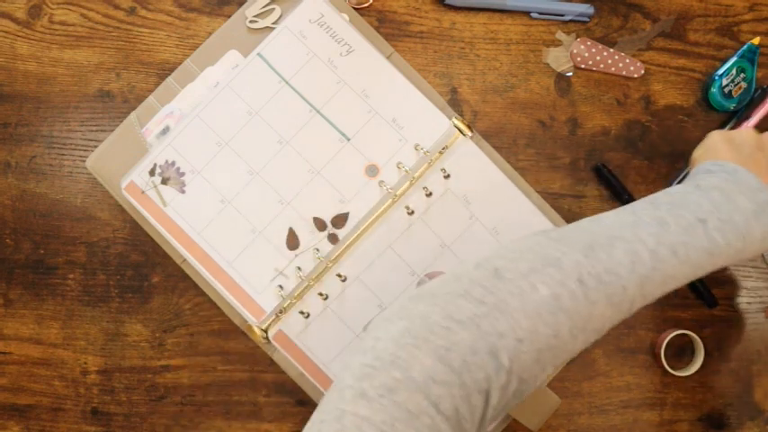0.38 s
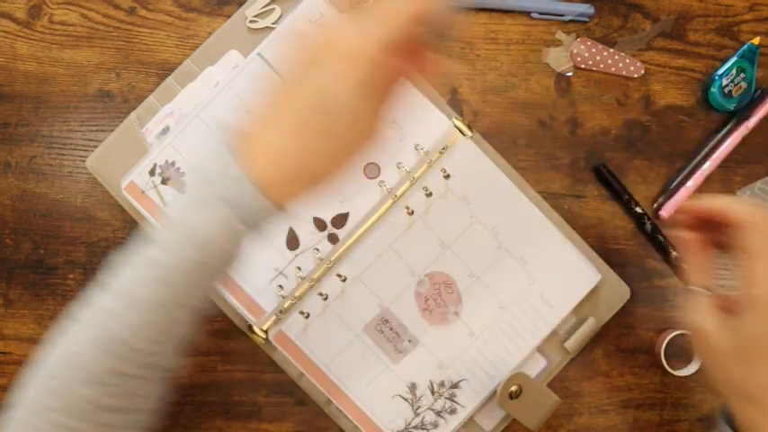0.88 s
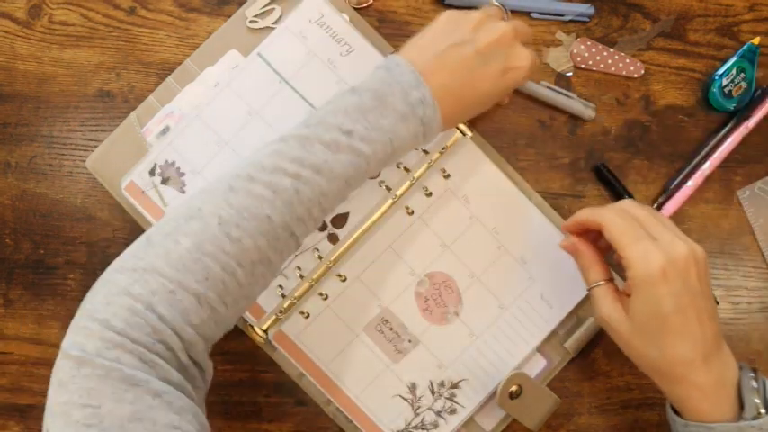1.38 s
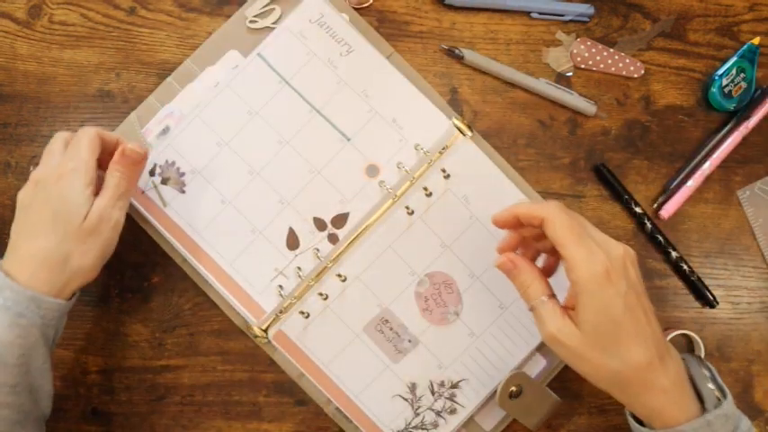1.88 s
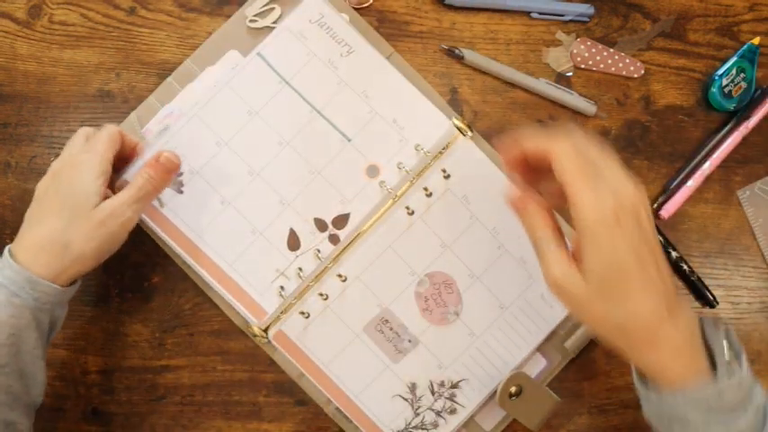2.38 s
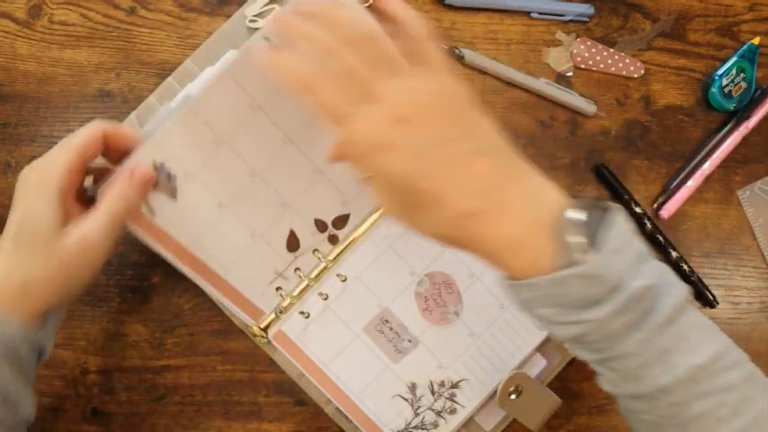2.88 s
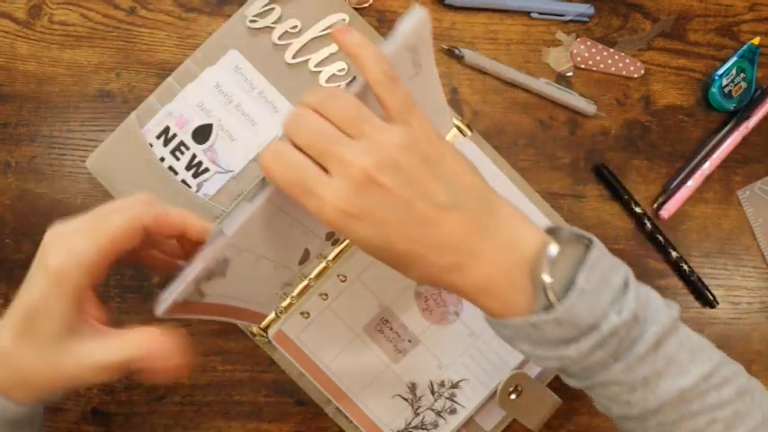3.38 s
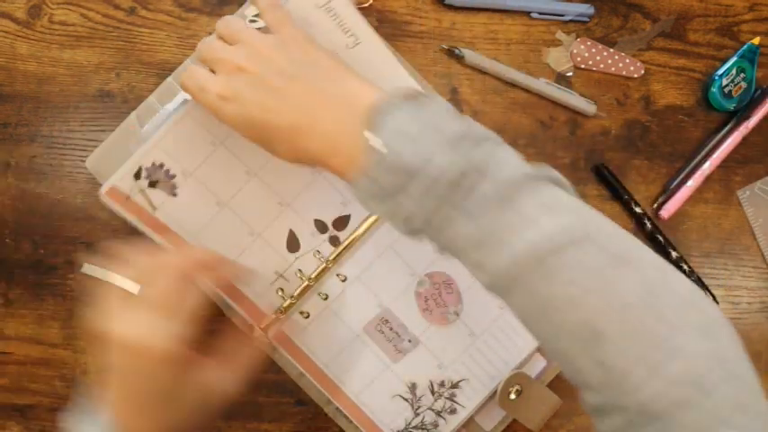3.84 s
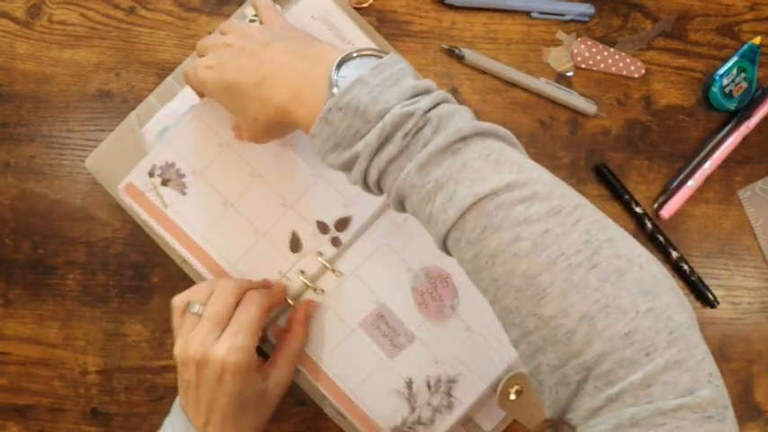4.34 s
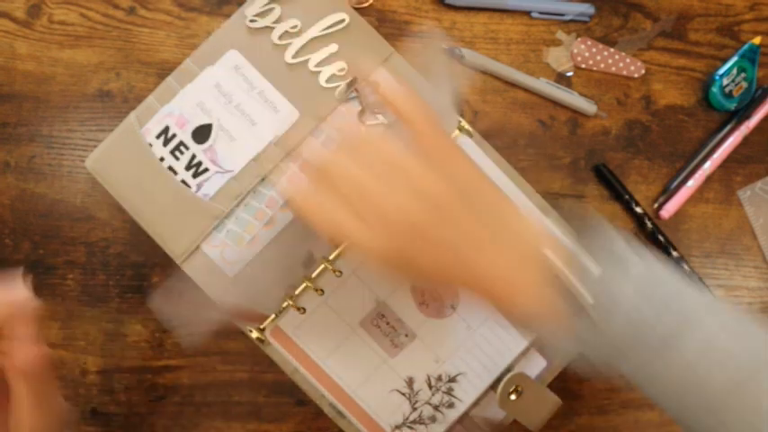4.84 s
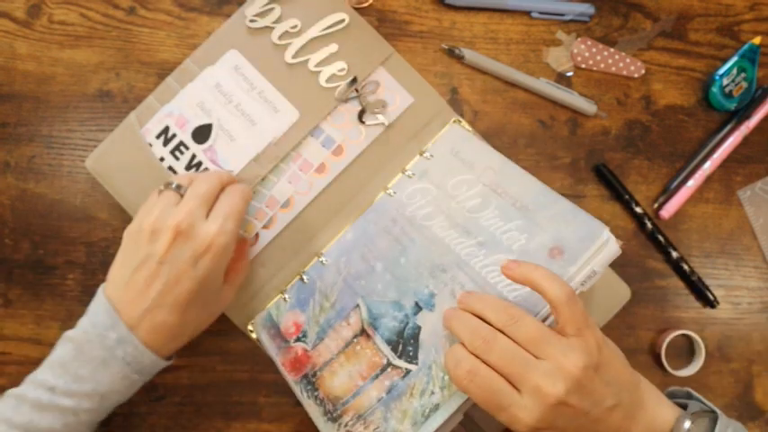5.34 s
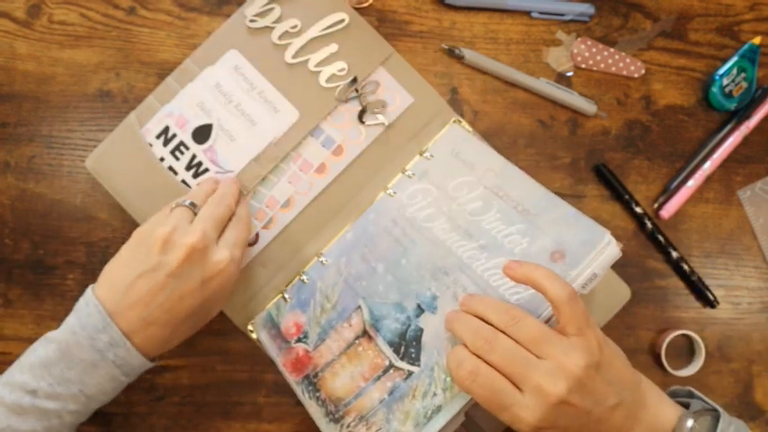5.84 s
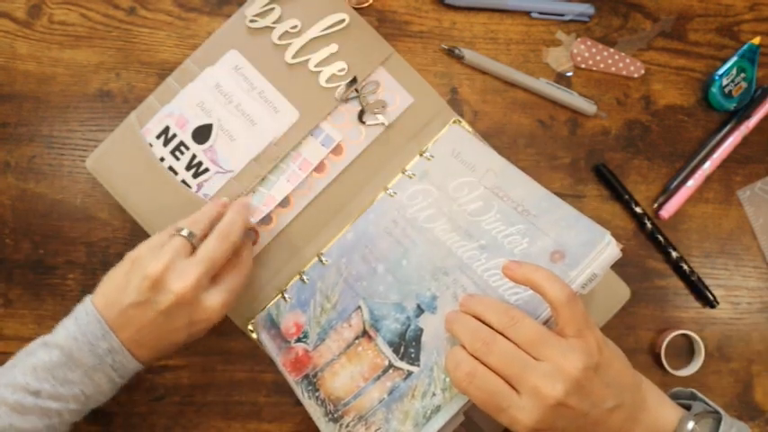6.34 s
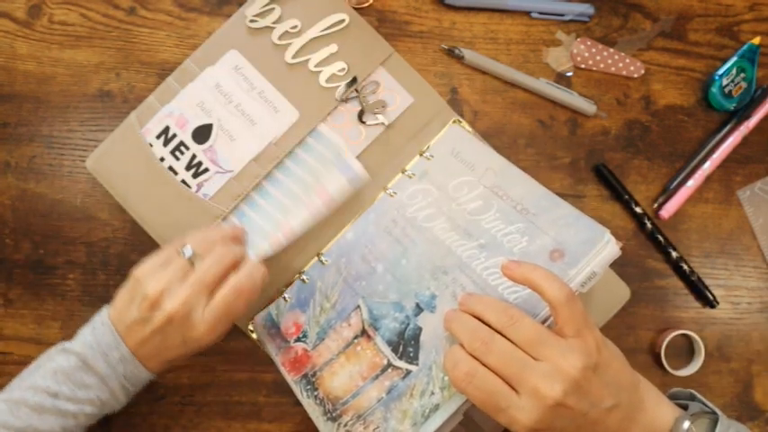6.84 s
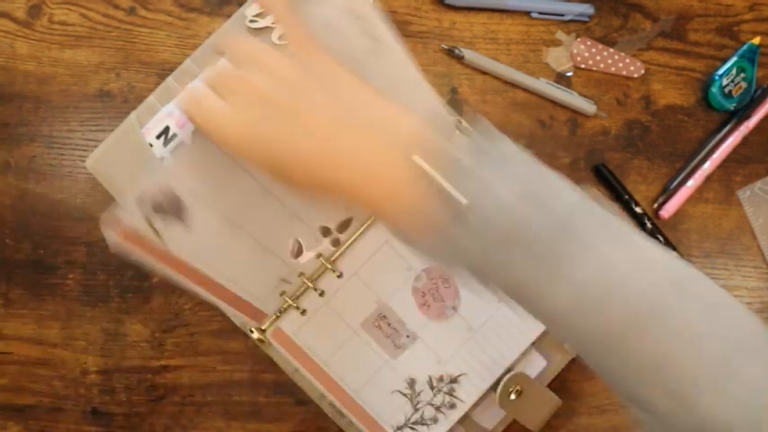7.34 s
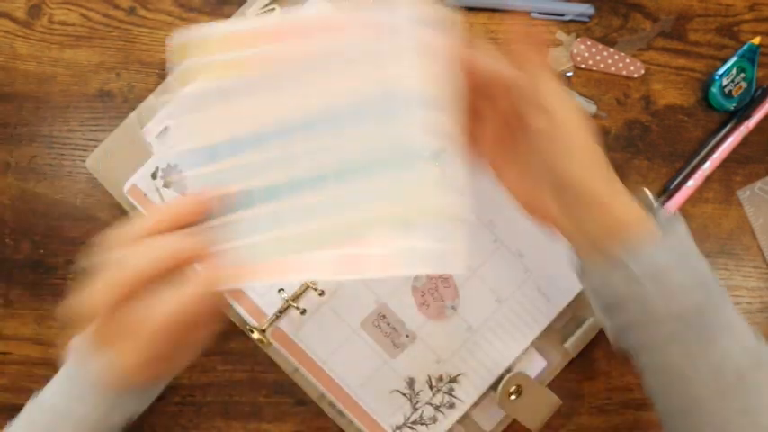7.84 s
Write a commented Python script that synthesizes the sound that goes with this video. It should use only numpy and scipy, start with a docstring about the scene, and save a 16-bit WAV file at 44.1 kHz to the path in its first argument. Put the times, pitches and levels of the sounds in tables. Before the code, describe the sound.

Pens clatter onto a wooden desk, paper rustles softly, binder rings snap loudly, then a sheet slides from a pocket and pages slap shut.

```python
"""Paper, pens and a binder are handled at a wooden desk in a quiet room.
Pages are thumbed, turned, slid from a pocket and slapped shut: fluttering fibre noise, dense sheet modes, puffs of air.
Plastic pens clatter and binder rings snap as short chatters that ring modes; blows and rolling drive the desk top.
Noise fills the room, which reflects hits and rubbing. Two close ports pick it all up, hits widened, and a
limiter follows."""
import sys
import numpy as np
from scipy import signal
from scipy.fft import rfft, irfft
from scipy.io import wavfile

SR = 44100
rng = np.random.default_rng(int(sys.argv[2]) if len(sys.argv) > 2 else 0)


def inscribe(sig):
    """Save sig as 16-bit PCM at rate SR to the path in sys.argv[1].

    A 1-D sig is mono; a 2-D sig holds one channel per row.
    Samples are clipped to [-1, 1] before scaling.
    """
    pcm = np.round(np.clip(np.atleast_2d(sig).T, -1, 1) * 32767)
    wavfile.write(sys.argv[1], SR, pcm.astype(np.int16))


def linear_from_db(decibels):
    """Turn decibels (scalar or array-like) into linear amplitude factors; 0 gives 1."""
    return 10 ** (np.asarray(decibels, float) / 20)


N = 351474

WIDEN_DB = 5.0   # gain of the difference between the ports


def rms_one(x):
    """Scale to unit rms."""
    return x / np.sqrt(np.mean(x ** 2) + 1e-20)


def at_hz(points, hz):
    """Read a table along log frequency."""
    table_hz, values = np.array(points).T[:2]
    return np.interp(np.log(hz + 1), np.log(table_hz), values)


def coloured(x, spectrum):
    """Weight a signal by a spectrum in dB, nothing outside its ends."""
    size = x.shape[-1]
    hz = np.arange(size // 2 + 1) * SR / size
    inside = (hz >= spectrum[0][0]) & (hz <= spectrum[-1][0])
    return irfft(rfft(x) * linear_from_db(at_hz(spectrum, hz)) * inside, size)


def band_limited(x, edges_hz, kind="low"):
    """Second-order Butterworth filter."""
    return signal.sosfilt(signal.butter(2, edges_hz, kind, fs=SR, output="sos"), x)


def swells(at, rise, fall, db):
    """Each movement gains 20 dB in its rise time and loses 20 dB in its fall time; movements add."""
    t, out = np.arange(N) / SR, np.zeros(N)
    for s, up, down, top_db in zip(at, rise, fall, db):
        near = slice(max(round((s - 3 * up) * SR), 0), round((s + 3 * down) * SR))
        out[near] += linear_from_db(top_db - 20 * np.maximum((s - t[near]) / up, (t[near] - s) / down))
    return out


def stereo(mid, side):
    """Left and right from mid and side."""
    return np.array([mid + side, mid - side])


def widened(pair):
    """Raise the difference between the two ports."""
    return stereo((pair[0] + pair[1]) / 2, linear_from_db(WIDEN_DB) * (pair[0] - pair[1]) / 2)


def all_around(mid, side, width):
    """Sound from every direction: the side is weighted by a width table, held level beyond its ends."""
    return stereo(mid, coloured(side, [(10, width[0][1])] + list(width) + [(20000, width[-1][1])]))


def air():
    """The steady noise of the room, alike at both ports in the bass and wide in the treble."""
    # Each row: frequency in Hz, relative density in dB per Hz.
    spectrum = [(13, -22.5), (22, -5), (82, -0.5), (299, -9.5), (344, -10), (394, -9), (440, -11),
                (664, -8.5), (722, -13), (1000, -14), (1250, -18), (1840, -17), (4550, -33), (7880, -38.5),
                (15700, -48.5)]
    # Each row: frequency in Hz, side in dB re mid.
    width = [(60, -23.5), (130, -4.5), (290, 3.5), (640, 2), (1410, 5), (3100, 9), (6820, 7.5),
             (15000, 7.5)]
    level_db = -52   # mid rms
    mid, side = coloured(rng.standard_normal((2, N)), spectrum)
    return linear_from_db(level_db) / mid.std() * all_around(mid, side, width)


def slides():
    """Skin and paper brush on paper: fibres catch thousands of times a second; the pressure flutters."""
    # Strokes. Each row: firmest at in seconds, rise in seconds, fall in seconds, hiss in dB, body in dB re hiss.
    strokes = [(0.6, .15, 0.46, -75, -0.5), (2.08, 0.48, 0.8, -74, 4.5), (2.226, .02, 0.023, -58.5, -12),
               (2.28, 0.024, 0.032, -63.5, 2), (2.36, 0.01, 0.12, -65, 4), (2.547, 0.016, 0.047, -49, -8),
               (2.585, 0.082, 0.062, -67, 14), (2.755, 0.023, 0.061, -70, 2),
               (2.848, 0.053, 0.079, -63, -1), (3.16, 0.018, .08, -56.5, -8),
               (3.656, 0.13, 0.074, -68, 5.5), (3.802, 0.089, 0.13, -59.5, -1),
               (4.02, 0.04, 0.24, -66, -11), (4.11, .2, 0.021, -64.5, -1), (4.2, 0.027, 0.05, -75, -2),
               (4.85, 0.02, .3, -67.5, 0), (5.257, 0.013, 0.019, -64, 1), (5.36, 0.06, 0.028, -67, -8),
               (5.43, 0.024, 0.1, -74, 3.5), (5.678, 0.032, 0.11, -66.5, -9), (6.0, 0.048, 0.29, -74, 3),
               (6.17, 0.16, .08, -68, -8), (6.24, 0.044, 0.037, -70, 8), (6.37, 0.055, 0.089, -59, 5),
               (6.534, 0.062, .15, -55.5, -7), (6.59, .1, 0.1, -61, 11), (7.14, .04, 0.055, -62, 5),
               (7.21, 0.037, 0.014, -56, 2), (7.296, 0.039, 0.033, -61, 3),
               (7.404, 0.034, 0.034, -57.5, 10), (7.526, 0.043, .02, -43.5, -7),
               (7.728, .02, 0.02, -61, -9), (7.965, 0.015, 0.027, -60.5, 10.5)]
    # A sheet drawn from its pocket, faster until it slips free. Each row: time in seconds, hiss in dB.
    pull_track = [(6.69, -76), (6.719, -51.5), (6.917, -49.5), (6.975, -41.5), (7.017, -35), (7.044, -36),
                  (7.065, -63), (7.11, -82)]
    # Rubbing treble. Each row: frequency in Hz, relative density in dB per Hz.
    hiss_spectrum = [(2650, -6.5), (4500, -8), (4840, 1.5), (6870, 2.5), (9060, -1.5), (10200, -1),
                     (11300, 1), (14400, -17.5), (15700, -26)]
    # Rubbing lows and middle. Each row: frequency in Hz, relative density in dB per Hz.
    body_spectrum = [(530, -69), (900, -38), (1000, -18.5), (1260, -22), (1710, -8), (3400, -8.5),
                     (4500, -15), (5850, -72), (9900, -120)]
    grain_db, flutter_db, pull_body_db = 1.6, 1.2, -1.5   # body re hiss
    fidget_db, fidget_body_db, fidget_swing_db = -85.5, 9.5, 7   # body re hiss, swing rms
    hiss_side_db, body_side_db = 2.0, -18.5   # gain of the unlike part

    grains = linear_from_db(grain_db * rng.exponential(1, N)) * rng.standard_normal(N)
    flutter = band_limited(rng.standard_normal(N), 40)
    grains *= linear_from_db(flutter_db * rms_one(flutter))
    # the contact is long: part of it reaches the ports unalike
    along = rng.standard_normal(N) * abs(grains)
    sources = np.array([grains, along])

    at, rise, fall, hiss_db, body_db = np.transpose(strokes)
    pull = linear_from_db(np.interp(np.arange(N) / SR, *np.transpose(pull_track), left=-120, right=-120))
    # resting hands shift faintly all the time
    shifting = band_limited(rng.standard_normal(N), 8)
    fidget = linear_from_db(fidget_db + fidget_swing_db * rms_one(shifting))
    hiss_level = swells(at, rise, fall, hiss_db) + pull + fidget
    body_level = swells(at, rise, fall, hiss_db + body_db)
    body_level = body_level + linear_from_db(pull_body_db) * pull + linear_from_db(fidget_body_db) * fidget

    hiss, body = coloured(sources, hiss_spectrum), coloured(sources, body_spectrum)
    hiss = hiss_level * hiss / hiss[0].std()
    body = body_level * body / body[0].std()
    return stereo(hiss[0] + body[0], linear_from_db(hiss_side_db) * hiss[1] + linear_from_db(body_side_db) * body[1])


def room(x):
    """Dense reflections that build up in about a ms and die band by band."""
    # Decay. Each row: frequency in Hz, t60 in seconds.
    decay = [(100, 0.38), (500, 0.27), (2000, 0.34), (6000, 0.37), (14000, 0.22)]
    # Strength of the octave bands. Each row: frequency in Hz, relative gain in dB.
    colour = [(100, 3), (300, 13.5), (700, 11.5), (1400, 10), (2700, 10.5), (5400, 0), (11000, 2)]
    # Reflections of things near the ports. Each row: frequency in Hz, side in dB re mid.
    width = [(60, -8), (150, -30.5), (380, -19), (950, -4.5), (2380, 2.5), (5980, 8), (15000, 9)]
    level_db, build_up_s = -8, 0.00067
    t = np.arange(SR // 2) / SR
    echoes, edges_hz = 0, 60 * 2.0 ** np.arange(9)
    white = rng.standard_normal((2, 2, len(t)))   # neighbouring bands get unrelated noise
    for k, (low, high) in enumerate(zip(edges_hz, edges_hz[1:])):
        hz = np.sqrt(low * high)
        band = band_limited(white[k % 2], [low, high], "band")
        echoes = echoes + band * linear_from_db(at_hz(colour, hz) - 60 * t / at_hz(decay, hz))
    echoes = echoes * (1 - np.exp(-(t / build_up_s) ** 2))
    echoes = echoes / np.sqrt((echoes[0] ** 2).sum())
    mid, side = signal.fftconvolve(echoes, x[None])[:, :N]
    return linear_from_db(level_db) * all_around(mid, side, width)


def rolls():
    """Pens scuffing and rolling, and shut pages settling, drive the desk top with lumpy, dull noise."""
    # Each row: strongest at in seconds, rise in seconds, fall in seconds, level in dB.
    movements = [(0.14, 0.012, .2, -54), (0.195, 0.047, 0.052, -34.5), (0.257, .05, 0.051, -47),
                 (0.33, 0.09, 0.049, -58), (1.32, 0.016, 0.022, -43), (1.458, 0.046, 0.071, -37),
                 (7.589, 0.023, 0.086, -33.5)]
    bumps = linear_from_db(2.5 * rng.exponential(1, N)) * rng.standard_normal(N)
    dull = band_limited(bumps, [280, 1100], "band")
    return swells(*np.transpose(movements)) * rms_one(dull)


def struck(events, modes, cycles, chatter_s, left_lead_s):
    """A short chatter of touches sets modes ringing for a number of cycles plus 3 ms, at any pitch.
    Rows out: left port, right port, and the smoother sum over all directions that feeds the room."""
    size, lead_in_s, attack_s, facing_db = 2048, 1e-4, 7e-5, 2
    out, t = np.zeros((3, N + size)), np.arange(size) / SR
    hz, level_db = np.transpose(modes)[:, :, None]
    t60 = cycles / hz + 0.003
    chance = rng.standard_normal((len(events), len(modes) + 256))
    lead_s = left_lead_s * np.array([.5, -.5, 0])[:, None, None]
    since = np.maximum(t - lead_in_s + lead_s, 0)
    decay = linear_from_db(level_db - 60 * since / t60)
    rings = decay * np.cos(2 * np.pi * hz * since) * (1 - np.exp(-since / attack_s))
    groups = hz < 1200, (hz >= 1200) & (hz < 5000), hz >= 5000
    ranges_hz = [200, 1500], [950, 6000], [4200, 16000]   # each group radiates in its own range
    ports_only = np.array([1, 1, 0])[:, None, None]
    for (s, peak_db, low_db, high_db, pan_db), draw in zip(events, chance):
        touches = np.zeros((3, 256))
        fading = np.exp(-t[:256] / max(chatter_s, 1e-4))
        touches[:2] = .25 * draw[:256] ** 3 * fading * (abs(draw[:256]) > 1)
        touches[:, 0] = 1.5
        facing = linear_from_db(facing_db * draw[256:, None] * ports_only)
        parts = [signal.fftconvolve((rings * facing * group).sum(axis=1), touches, axes=1)[:, :size]
                 for group in groups]
        parts[0] = (rings * groups[0]).sum(axis=1)   # slow modes feel the chatter as one push
        parts = [band_limited(part, edges, "band") for edges, part in zip(ranges_hz, parts)]
        low, middle, high = [part / part[:, :400].std(axis=1)[:, None] for part in parts]
        sound = middle / abs(middle[:2]).max() + linear_from_db(low_db) * low + linear_from_db(high_db) * high
        at = round((s - lead_in_s) * SR)
        pan = linear_from_db(.5 * pan_db / linear_from_db(WIDEN_DB) * np.array([[1], [-1], [0]]))   # eased, as widening adds to it
        out[:, at:at + size] += linear_from_db(peak_db) * pan * sound
    return out[:, :N]


def pen_knocks():
    """Pens knock on the desk and on each other, ringing the modes of plastic."""
    # Each row: time in seconds, middle peak in dB, lows rms in dB re that peak, highs rms in dB re that peak,
    # left-right in dB before easing for the widening.
    knocks = [(0.1373, -46, -20, -21, 11), (0.168, -35, -5.5, -22, 6), (0.183, -39, -8, -6.5, 27),
              (0.196, -11.5, -27, -28, 10), (0.2125, -29, -8, -39, 7), (0.2778, -50, -12, -4.5, 17),
              (0.2967, -42, 0, -32, 5), (0.3167, -32, -21, -15, 12), (1.2906, -10, -27.5, -25, 11),
              (1.3082, -15.5, -24, -53, -4), (1.319, -39, -27, -36, 4), (1.3812, -16.5, -44, -24.5, 12),
              (1.3941, -18.5, -28, -26.5, -6), (1.4055, -34, 8, -17, 0), (1.4192, -23, -17, -46, 2.0),
              (1.4351, -14, -27, -17.5, 15), (1.4701, -22, -24, -37, 9), (1.4753, -21.5, -20, -45, 4),
              (1.4997, -23.5, -38, -43, 4)]
    # Each row: frequency in Hz, relative level in dB.
    modes = [(330, 9.5), (460, 9.5), (650, -6), (820, 4.5), (1000, -9), (1254, -29), (1500, -5.5),
             (1744, 2.5), (2159, 3), (2536, 3.5), (2891, 4.5), (3300, -5), (3666, -1), (4200, -4),
             (4700, -33), (5157, 2), (5800, -10), (6400, 4.5), (7100, 8), (7900, 8), (8700, 5), (9500, 4.5),
             (10600, 3), (11780, -20), (13300, -34.5)]
    return struck(knocks, modes, cycles=8.0, chatter_s=0.0013, left_lead_s=4.5e-5)


def desk():
    """A soft, low-passed push rings the low modes of the desk top; a harder hand wakes the upper ones more."""
    # Blows. Each row: time in seconds, relative drive in dB, extra drive of the modes above 140 Hz in dB.
    thumps = [(0.199, -36, 11.5), (1.29, -34, 7.5), (1.406, -23, 6.5), (1.434, -32, 8), (1.463, -42, -5),
              (4.361, -19.5, 2), (7.58, -12, -11), (7.634, -24.5, -6)]
    # Each row: frequency in Hz, relative level in dB, t60 in seconds.
    modes = [(75, -26, 0.071), (120, -3, 0.11), (161, -8, 0.049), (245, -3.5, 0.04), (297, -23.5, .08),
             (369.4, -16, 0.073), (483, -9.5, 0.059)]
    drive_db, push_cutoff_hz = 2.0, 500
    s, blow_db, upper_db = np.transpose(thumps)
    out, soft = 0, np.exp(-2 * np.pi * push_cutoff_hz / SR)
    for k, (hz, level_db, t60) in enumerate(modes):
        push = np.full(N, 1e-18)
        push[np.round(s * SR).astype(int)] = linear_from_db(blow_db + level_db + upper_db * (hz > 140) + drive_db)
        r, w = linear_from_db(-60 / (t60 * SR)), 2 * np.pi * hz / SR
        ringing = signal.lfilter([0, np.sin(w)], [1, -2 * r * np.cos(w), r * r], push)
        out = out + (-1) ** k * ringing
    return signal.lfilter([1 - soft], [1, -soft], out)


def paper_snaps():
    """Paper buckles, flicks and slaps: a sheet has dense modes, evenly spaced in pitch."""
    # Each row: time in seconds, middle peak in dB, lows rms in dB re that peak, highs rms in dB re that peak,
    # left-right in dB before easing for the widening.
    events = [(2.0644, -57.5, -17, -2.5, -1.0), (2.2238, -37, -17, -45, -6), (2.2756, -49.5, -6, -10, -5),
              (2.356, -48.5, -1, -23, -7), (2.5441, -45, -24, -10, -10), (2.5854, -32, -20, -41, -8),
              (2.6419, -44.5, -4, -24, -3.0), (2.7392, -46, -20, -19, -2.0), (2.8464, -53, -17, -6, -2.0),
              (3.1521, -26, -22, -26, -1.0), (3.1638, -26, -21, -22, -8), (3.1656, -28.5, -30, -21.5, 6),
              (3.6847, -38, -12.5, -40, 1), (3.8018, -47.5, -7.5, -5, 0.0), (3.9794, -44, -22, -26.5, -6),
              (4.0252, -39.5, -7.5, -19.5, -7), (4.0368, -45.5, -1.5, -23, 1),
              (4.0909, -39.5, -14, -24, -2), (4.1164, -34, -26, -36.5, -11.5), (6.2312, -58, -8, -16, 0),
              (6.3051, -56, -2, -4, 2), (6.349, -40.5, -22, -17.5, -7), (6.6101, -30, -41, -18.5, -2),
              (6.6181, -25.5, -53, -28, -4), (6.7164, -38, -18, -12.5, -11), (7.1218, -43.5, -12, -34, -8),
              (7.1591, -34.5, -14, -23, -6), (7.1896, -28.5, -13, -20, -1), (7.289, -46, -9, -10, -3),
              (7.2963, -43, -10.5, -18, -5), (7.4083, -31.5, -23, -22, -12), (7.4263, -25.5, -43, -28, -21),
              (7.55, -33, -8, -27, 0), (7.5745, -7, -12.5, -24, -2.5), (7.5783, -22, -3, -8, -1),
              (7.5815, -20, -12, -16, 0), (7.6365, -20, -9.5, -21.5, -1.5), (7.724, -39.5, -3.5, -39, -2),
              (7.8112, -43.5, 6, -17, -1.5)]
    # Strength of the sheet's modes. Each row: frequency in Hz, relative level in dB.
    strength = [(300, -9), (600, 0.5), (1100, 2), (2000, 8), (3500, 8), (6000, -6), (10000, 3),
                (14500, -15)]
    to_room_db = -5.5   # the hands and the book shade the paper from the walls
    hz = np.geomspace(300, 14500, num=36)
    modes = np.transpose([hz, at_hz(strength, hz)])
    snaps = struck(events, modes, cycles=7.0, chatter_s=0.0043, left_lead_s=-2.5e-5)
    return snaps * linear_from_db(np.array([[0], [0], [to_room_db]]))


def ring_snaps():
    """Binder rings snap and tick, ringing the modes of metal."""
    # Each row: time in seconds, middle peak in dB, lows rms in dB re that peak, highs rms in dB re that peak,
    # left-right in dB before easing for the widening.
    snaps = [(4.3609, 4, -18, -15.5, -2.5), (4.6694, -67, -3.5, 13.5, 6), (4.704, -44.5, -12.5, -6, 4),
             (4.7198, -46.5, -10, 4.5, -3), (4.7393, -52.5, 3.5, -2.5, 3), (4.7444, -50.5, -14, -2, 4)]
    # Each row: frequency in Hz, relative level in dB.
    modes = [(450, -7.5), (600, 5.5), (680, -1), (764, 4), (900, -8), (1050, 6), (1220, -7), (1400, -3.5),
             (1712, 8), (1992, 9.5), (2300, 4), (2600, 8), (3100, 1), (3600, 5.5), (4151, 12.5),
             (4350, 4.5), (5000, -11.5), (5426, -9), (5965, -1.5), (6700, -10), (7600, -4), (8500, -4.5),
             (9512, -1), (10400, -12), (11300, -7), (12400, -12.5), (13500, -18), (14800, -29.5)]
    return struck(snaps, modes, cycles=11.0, chatter_s=0.0023, left_lead_s=1.5e-5)


def flap():
    """Swinging pages puff low, lumpy air at both ports."""
    # Each row: strongest at in seconds, rise in seconds, fall in seconds, level in dB.
    puffs = [(7.014, .05, 0.046, -49.5), (7.21, .35, 0.15, -52.5), (7.32, 0.087, .2, -59),
             (7.56, 0.23, .03, -52)]
    lumpy = band_limited(rng.standard_normal(N), [60, 260], "band")
    return swells(*np.transpose(puffs)) * rms_one(lumpy)


def scene():
    """Knocks, snaps and rubbing reach the ports directly and through the room."""
    hits = pen_knocks() + paper_snaps() + ring_snaps() + desk() + rolls()
    rubbing = slides()
    reflections = room(hits[2] + 0.3 * rubbing[0])
    return widened(hits) + rubbing + reflections + flap() + air()


def roll_off(x):
    """The treble ends steeply here."""
    return signal.sosfilt(signal.butter(12, 15820, fs=SR, output="sos"), x)


def record(dry):
    """A limiter ducks after loud peaks and recovers steadily; what outruns it clips."""
    limit_db, release_db_per_s, attack_s = -3.0, 111, 0.013
    dry = band_limited(dry, 45, "high")   # the ports are deaf to the lowest bass
    over_db = np.maximum(20 * np.log10(abs(dry).max(axis=0) + 1e-9) - limit_db, 0)
    ramp_db = release_db_per_s * np.arange(N) / SR
    held_db = np.maximum.accumulate(over_db + ramp_db) - ramp_db
    r = np.exp(-1 / (attack_s * SR))
    duck_db = signal.lfilter([1 - r], [1, -r], held_db)
    mix = np.clip(dry * linear_from_db(-duck_db), -1, 1)
    return roll_off(mix)


dry = scene()
out = record(dry)
inscribe(out)
```